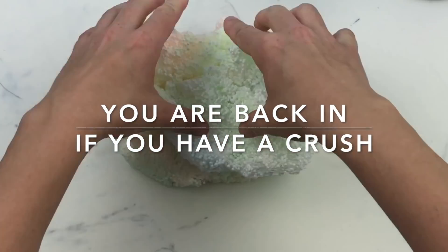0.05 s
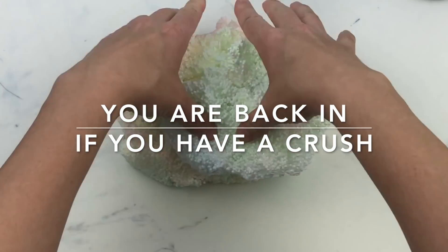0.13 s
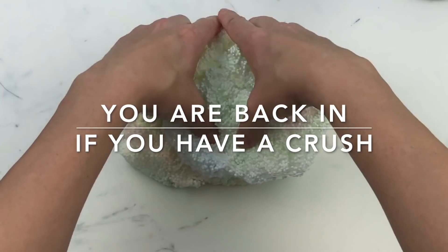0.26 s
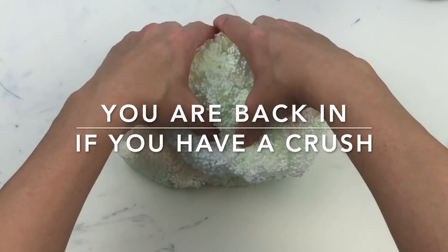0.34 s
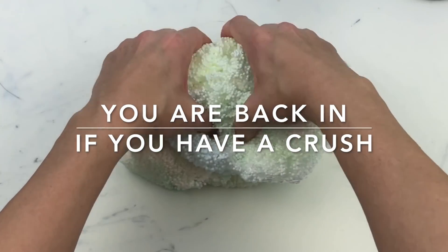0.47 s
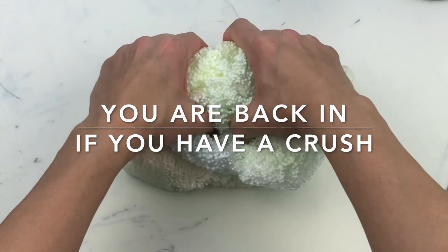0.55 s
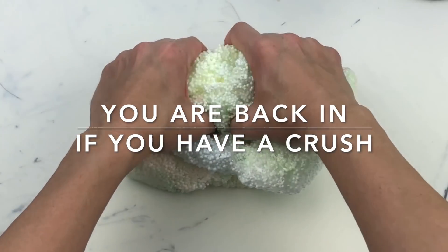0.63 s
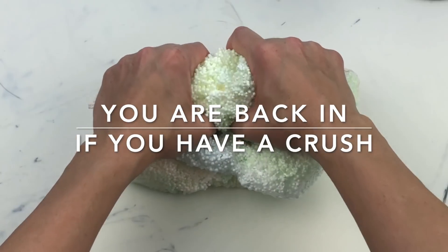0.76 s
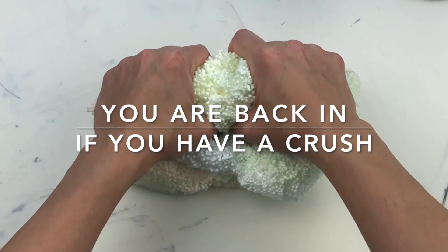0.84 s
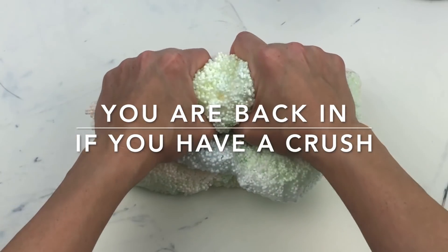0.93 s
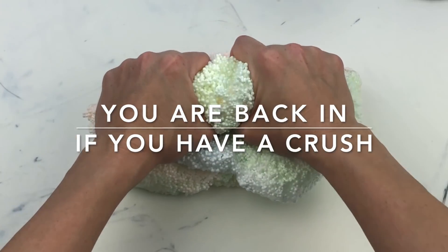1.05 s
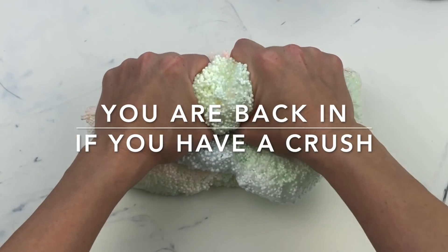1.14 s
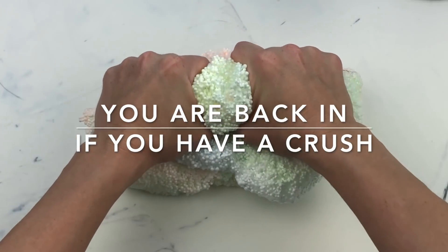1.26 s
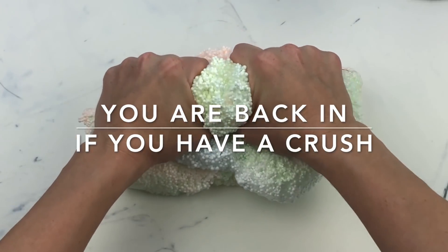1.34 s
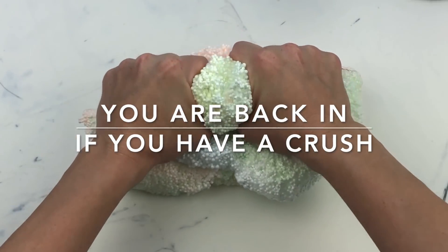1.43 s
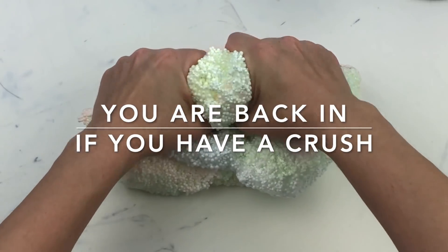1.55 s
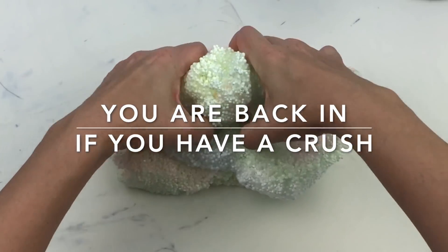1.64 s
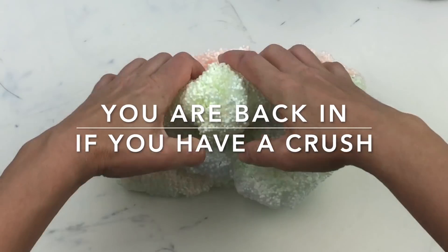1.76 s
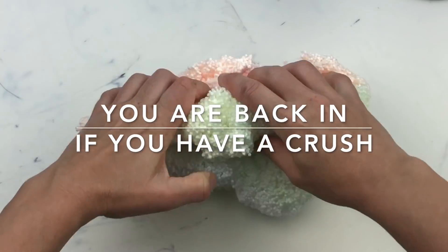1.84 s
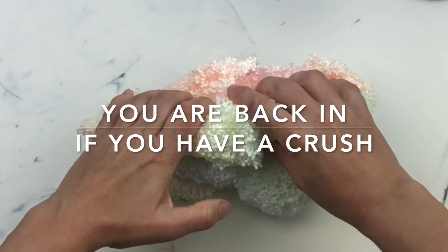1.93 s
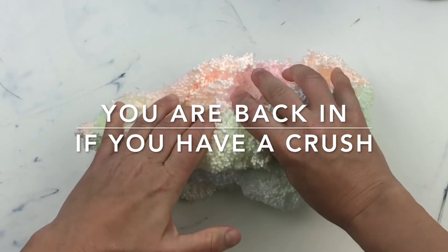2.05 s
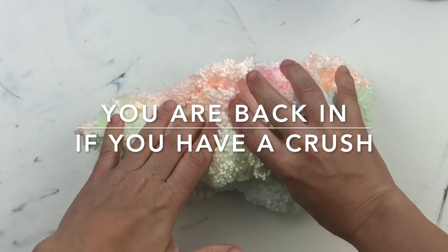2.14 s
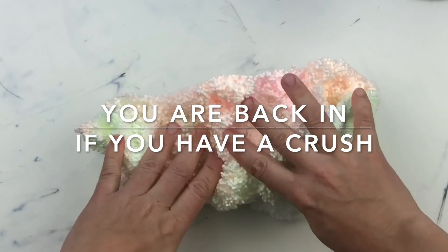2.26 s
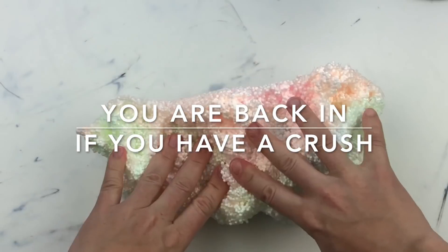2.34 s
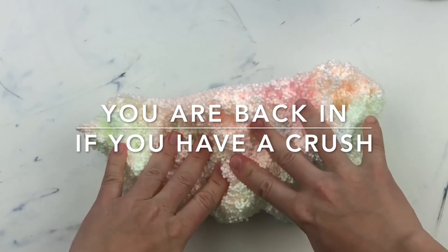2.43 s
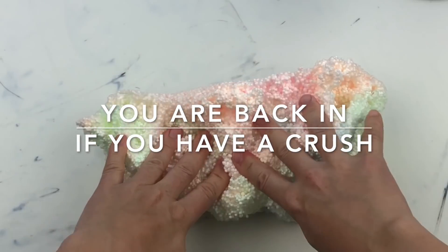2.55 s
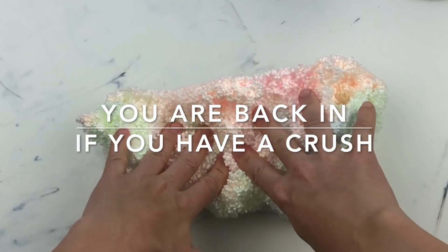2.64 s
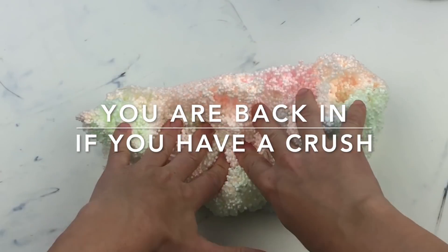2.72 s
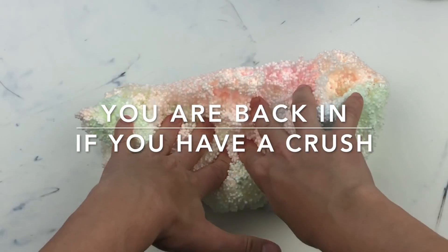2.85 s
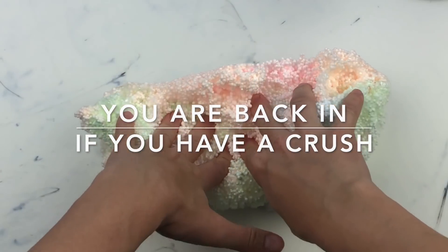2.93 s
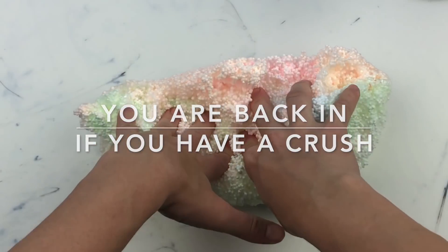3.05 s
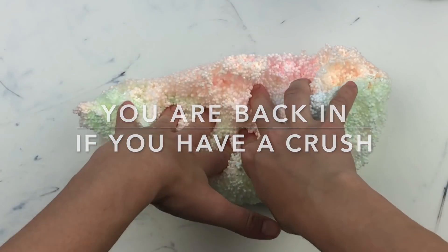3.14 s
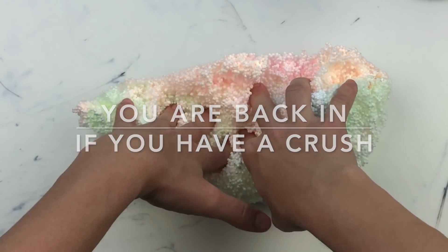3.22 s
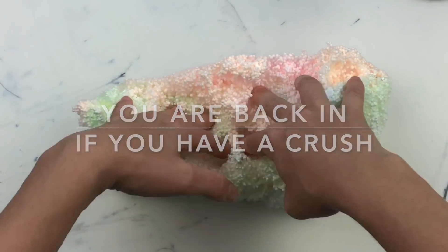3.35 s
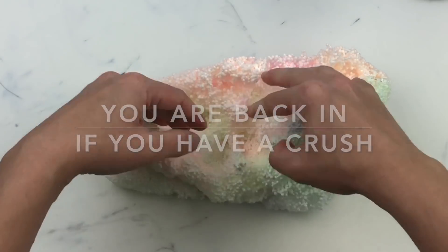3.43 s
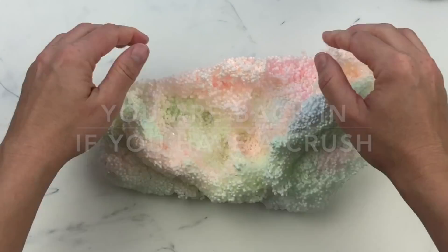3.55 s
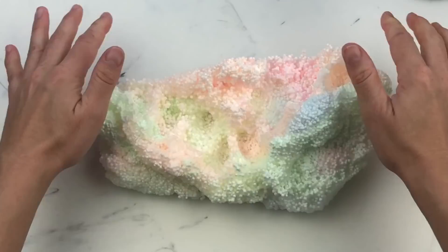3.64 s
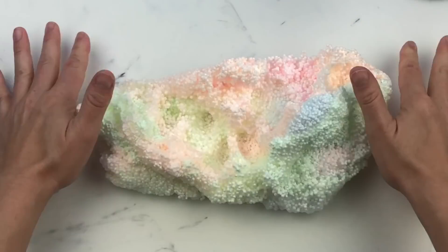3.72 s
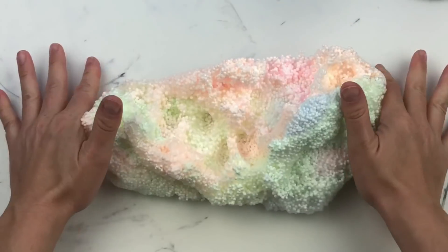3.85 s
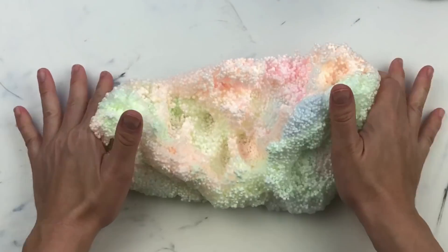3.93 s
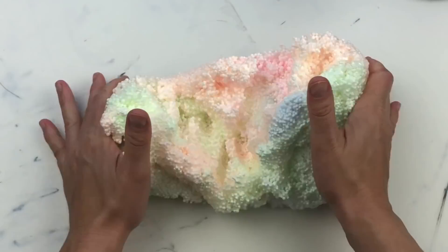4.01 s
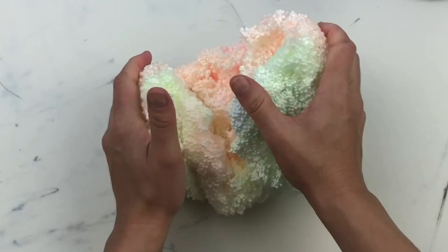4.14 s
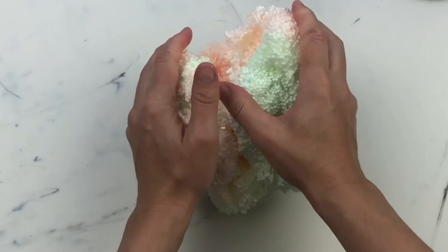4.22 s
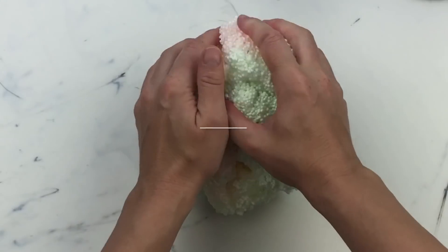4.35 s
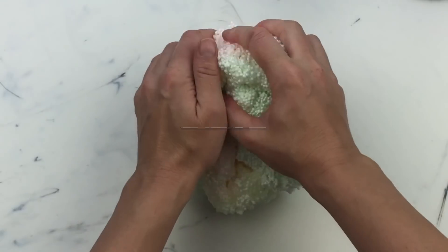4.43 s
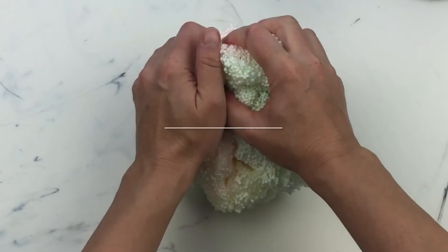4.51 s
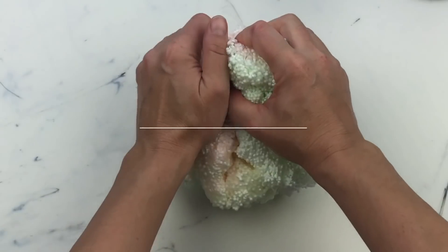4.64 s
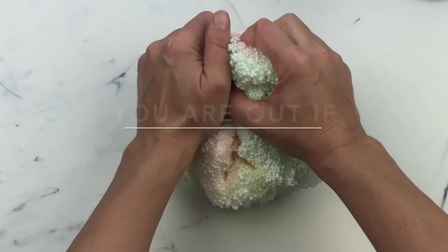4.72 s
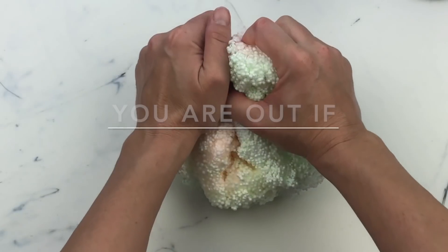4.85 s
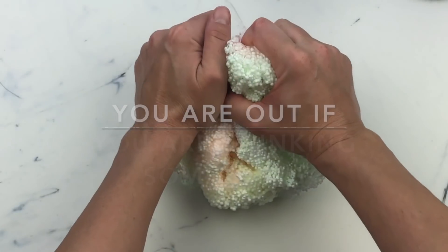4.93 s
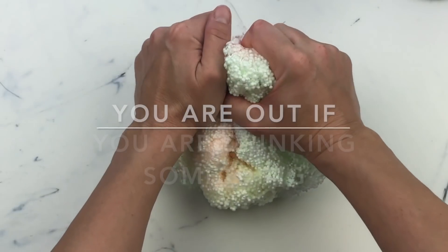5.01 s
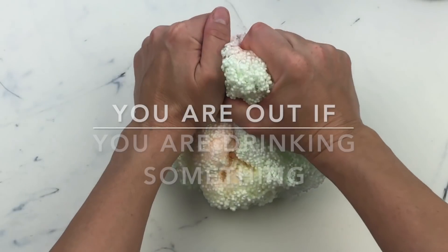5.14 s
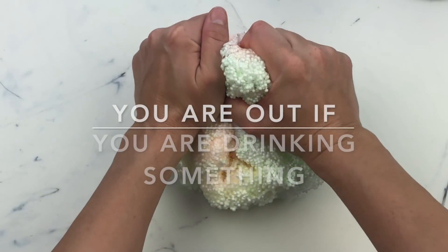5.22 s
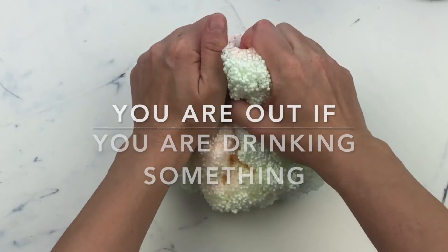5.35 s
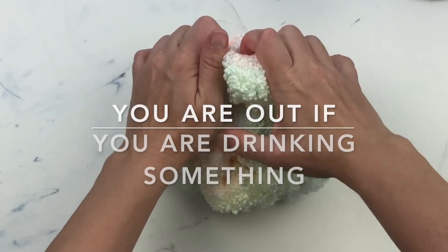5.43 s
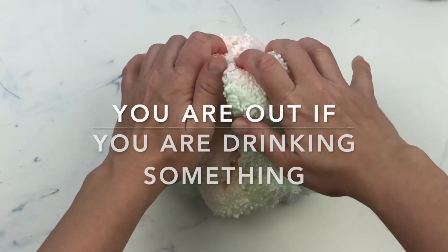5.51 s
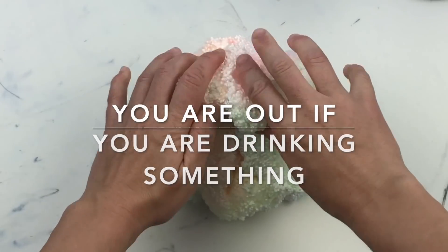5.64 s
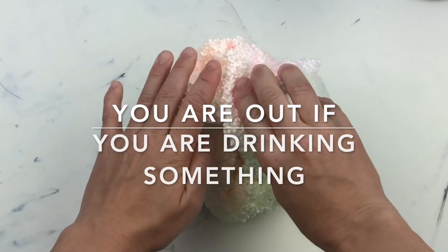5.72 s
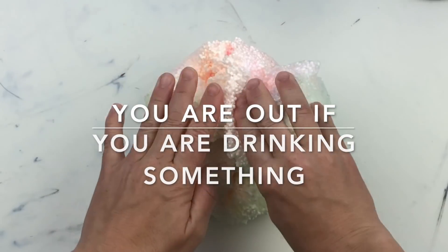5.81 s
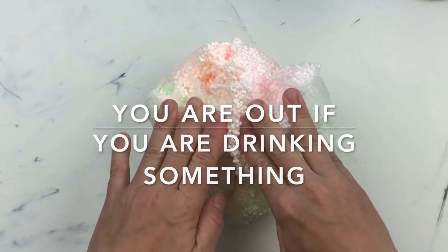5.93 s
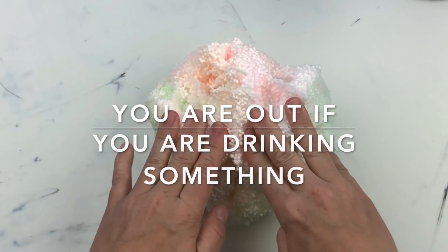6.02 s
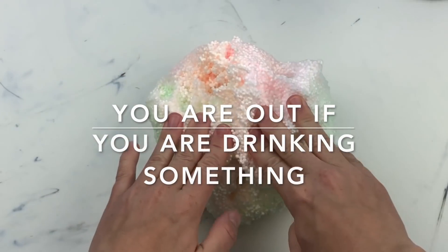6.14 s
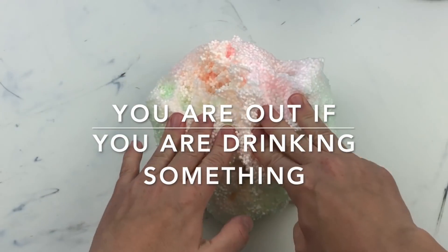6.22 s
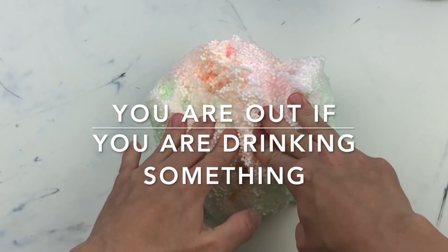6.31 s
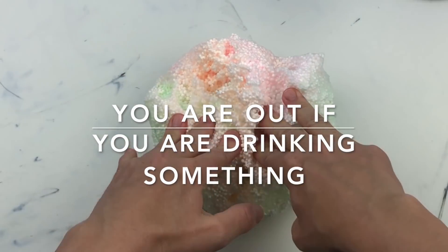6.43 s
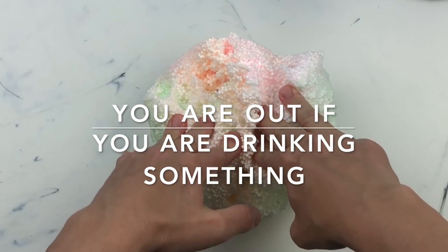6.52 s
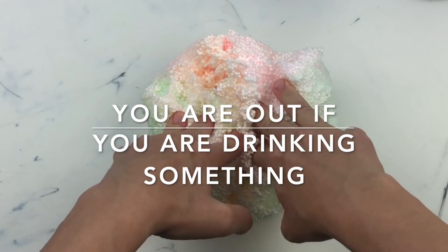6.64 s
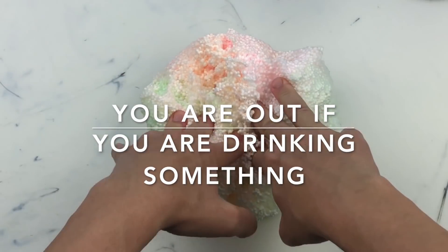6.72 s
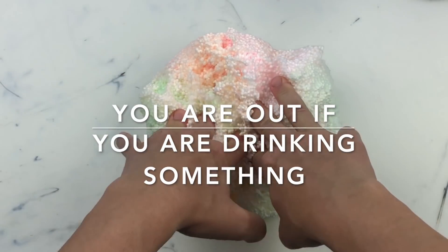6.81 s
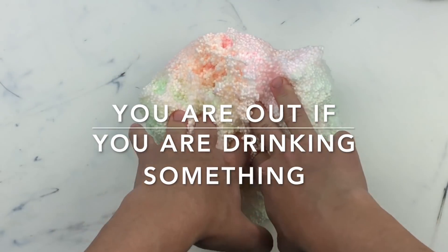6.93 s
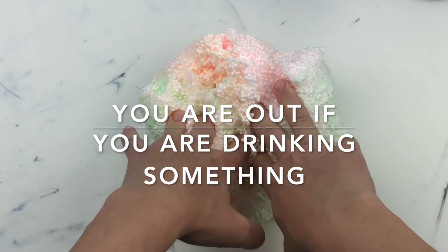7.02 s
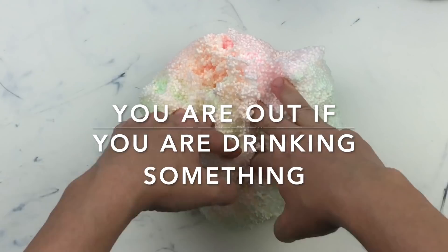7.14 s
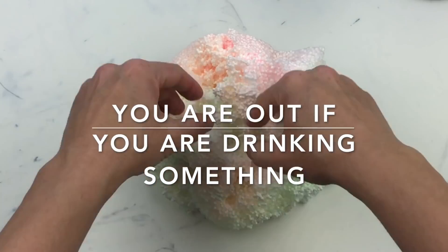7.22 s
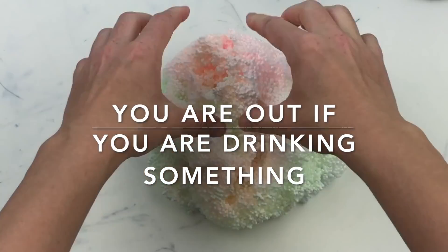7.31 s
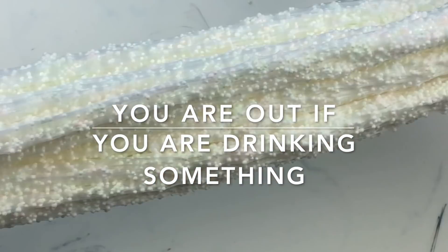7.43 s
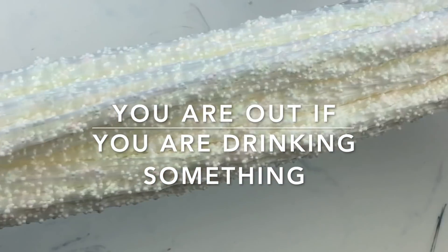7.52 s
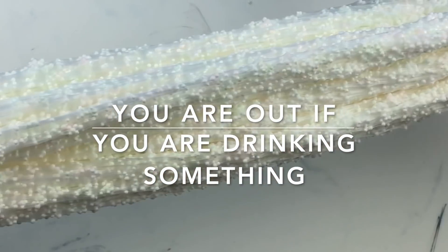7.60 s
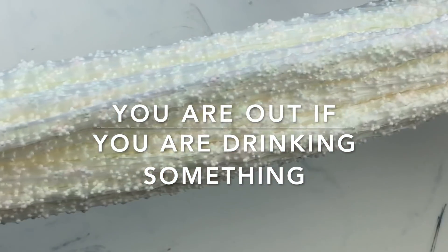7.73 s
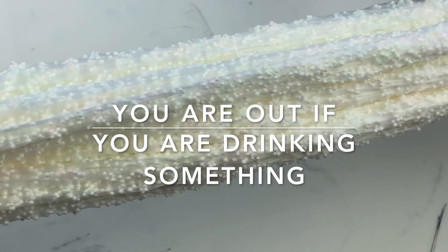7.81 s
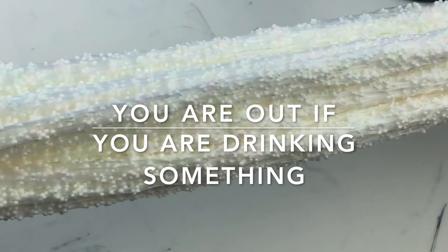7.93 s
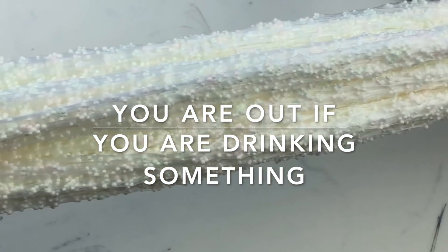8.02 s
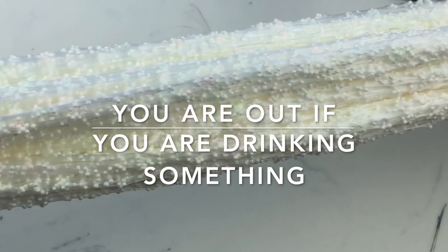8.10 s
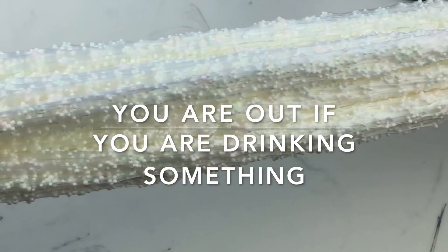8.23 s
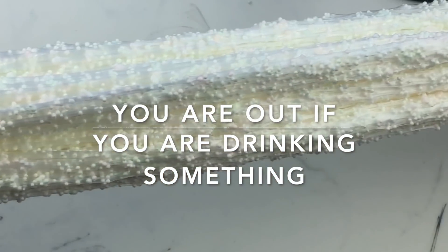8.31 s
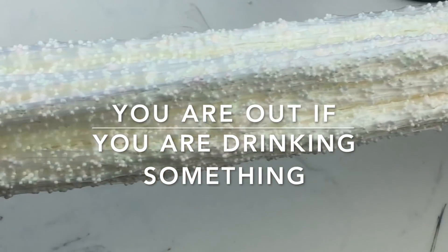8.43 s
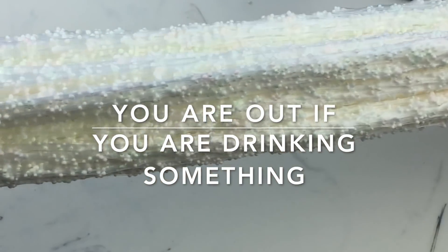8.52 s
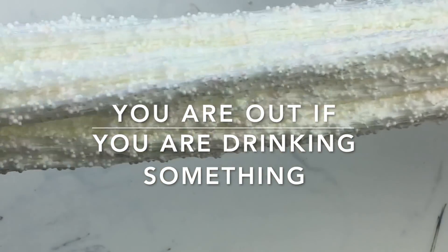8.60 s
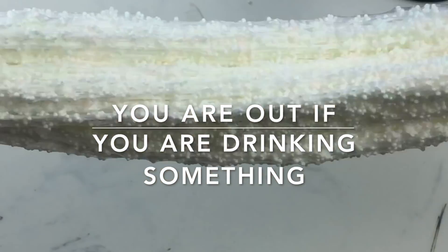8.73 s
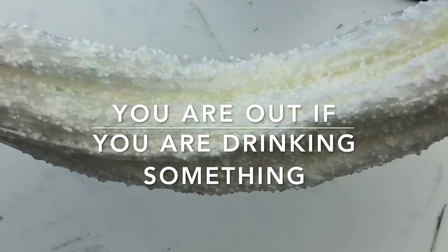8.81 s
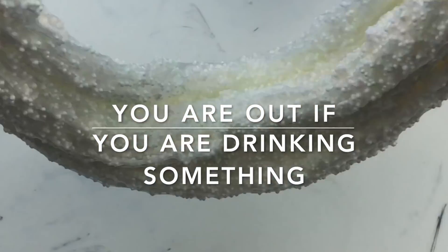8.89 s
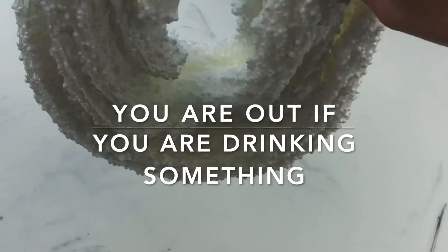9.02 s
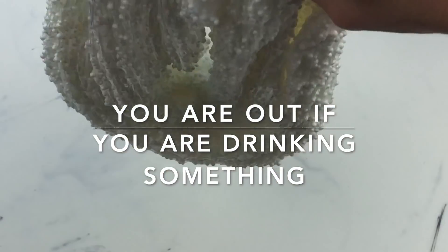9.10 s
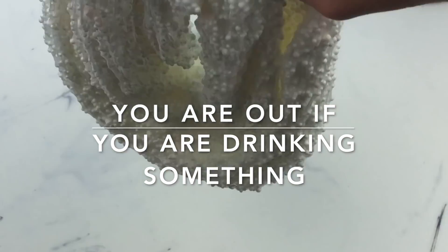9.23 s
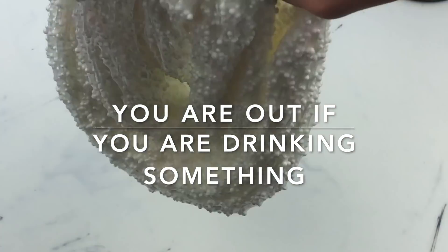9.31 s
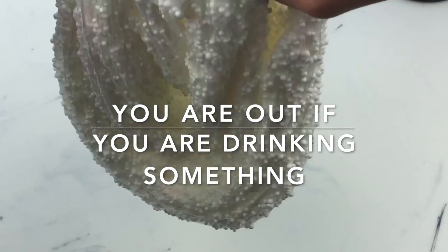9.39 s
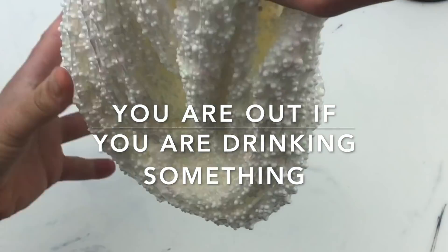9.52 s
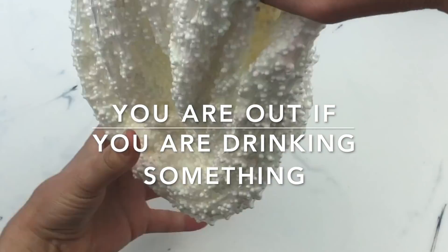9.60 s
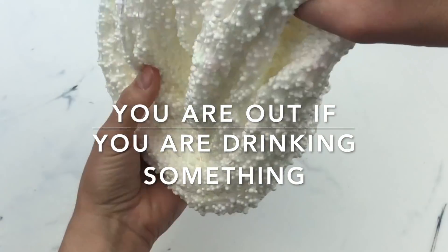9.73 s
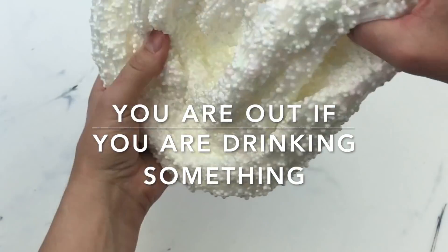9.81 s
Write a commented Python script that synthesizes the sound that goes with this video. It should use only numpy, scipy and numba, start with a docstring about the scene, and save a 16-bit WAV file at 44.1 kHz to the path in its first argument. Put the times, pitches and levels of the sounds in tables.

```python
"""Two hands knead a lump of foam-bead slime on a table, close by in a small quiet room.
Beads part from the sticky glue as a crackle of ringing ticks, and folds let air sputter out in squelches.
The table thuds and rumbles as shaken resonances; a gliding sine makes a high squeak near 2.4 s, another a faint tone.
Trapped air pockets burst as torn, ringing pops, most densely and loudly from about 4.4 to 5.2 s.
At about 7.5 s later strokes set in abruptly: the hands pull the slime into a long band and fold it."""
import sys
import numpy as np
from scipy import signal
from scipy.fft import rfft, irfft
from scipy.io import wavfile
from scipy.ndimage import uniform_filter1d
from numba import njit

SR = 44100
rng = np.random.default_rng(int(sys.argv[2]) if len(sys.argv) > 2 else 0)


def file_out(sig):
    """Save sig as 16-bit WAV at sys.argv[1]."""
    # one column per channel
    cols = np.atleast_2d(sig).T
    # limit, then scale
    lim = np.clip(cols, -1, 1)
    pcm = np.round(lim * 32767).astype(np.int16)
    wavfile.write(sys.argv[1], SR, pcm)


N = 434826
TIME = np.arange(N) / SR

# palms and lump landing on the table: (peak_time_s, level_db before a small trim, pitch_hz)
THUDS = [(0.032, -13, 95), (0.298, -9, 65), (0.61, -15.5, 55.7), (1.679, -3, 45), (1.923, -14, 58),
         (2.399, -17, 68), (3.047, -16, 70), (3.388, -16.5, 51.87), (3.44, -20, 65), (3.506, -16, 54.5),
         (3.832, -19.5, 63), (4.034, -18.5, 65), (4.27, -15.5, 49), (5.493, -1, 68), (5.561, -10.5, 50.17),
         (5.722, -16.5, 63.2), (5.776, -19.5, 64.6), (7.225, -19, 56.24), (7.293, -13, 58.64)]
# resonances of the table top: (pitch_hz, width_hz, relative_level_db)
TOP_MODES = [(177.7, 10, -0.5), (232, 35, -20), (293.7, 7.3, -11)]


def from_db(db):
    """Turn decibels into a gain."""
    return 10 ** (np.asarray(db) / 20)


def rms_one(x):
    """Scale a sound to an average power of 1."""
    return x / np.sqrt(np.mean(x ** 2) + 1e-20)


def in_time(rows):
    """Draw straight lines between the points of a table, for every sample."""
    time_s, *columns = np.transpose(rows)
    return [np.interp(TIME, time_s, column) for column in columns]


def at_hz(points, hz):
    """Read a level between the points of a table, with pitch on a log scale."""
    point_hz, point_db = np.transpose(points)
    return np.interp(np.log(hz), np.log(point_hz), point_db)


def add(out, start_s, sound):
    """Mix in a sound at a given time."""
    at = int(np.clip(round(start_s * SR), 0, N - 1))
    out[at:at + len(sound)] += sound[:N - at]


def band(x, low_hz, high_hz, order=2):
    """Keep only the pitches between two limits (Butterworth band-pass)."""
    limits = [low_hz, min(high_hz, .48 * SR)]
    return signal.sosfilt(signal.butter(order, limits, "band", fs=SR, output="sos"), x)


def resonate(x, hz, quality):
    """Ring at one pitch with gain 1 there; a higher quality rings longer."""
    w = 2 * np.pi * min(hz, .45 * SR) / SR
    damp = np.sin(w) / (2 * quality)
    # the tiny offset keeps the filter from slowing down on near-zero numbers
    return signal.lfilter([damp, 0, -damp], [1 + damp, -2 * np.cos(w), 1 - damp], x + 1e-18)


def drift(per_s):
    """Wander at random between new values drawn per_s times a second, with power 1."""
    knots = np.arange(0, TIME[-1] + 1, 1 / per_s)
    return rms_one(np.interp(TIME, knots, rng.standard_normal(len(knots))))


def even(x, span_s):
    """Level out a sound so that its power stays near 1 over a running span."""
    power = np.abs(uniform_filter1d(x ** 2, int(span_s * SR)))
    return x / np.sqrt(power + 1e-12)


def together(*columns_db):
    """Add the powers of unrelated sounds and return the joint level in dB."""
    power = np.sum(from_db(np.hstack(columns_db)) ** 2, axis=1)
    return 10 * np.log10(power + 1e-12)


def air():
    """The steady hush of the room: random noise shaped by a fixed spectrum."""
    # colour of the hush: (pitch_hz, relative_level_db)
    hush_colour = [(60, -4), (180, -1), (500, -6), (1500, -17), (5000, -72), (16000, -15)]
    hush_db = -60
    hz = np.maximum(np.arange(N // 2 + 1) * SR / N, 1)
    spectrum = rfft(rng.standard_normal(N)) * from_db(at_hz(hush_colour, hz))
    return from_db(hush_db) * rms_one(band(irfft(spectrum, N), 30, 15000))


def room(x, near_db=-11, near_t60=0.021, far_db=-19, far_t60=0.21, edge_count=7):
    """Distinct echoes, a quick scatter and a faint tail; scatter and tail are noise led by the sound's power."""
    # reflections off the table and nearby things: (delay_s, level_db)
    echo_rows = [(.0019, -15), (0.01, -19)]
    t = TIME[:SR // 4]
    lingering = np.zeros(len(t))
    for t60, db in [(near_t60, near_db), (far_t60, far_db)]:  # t60 (s) sets how fast each part fades
        power = from_db(-120 * t / t60) * (t > .001)
        lingering += from_db(2 * db) * power / power.sum()
    out, edges = x.copy(), np.geomspace(300, 16000, edge_count)
    for low_hz, high_hz in zip(edges, edges[1:]):
        power = signal.oaconvolve(band(x, low_hz, high_hz, order=3) ** 2, lingering)[:N]
        noise = rms_one(band(rng.standard_normal(N), low_hz, high_hz, order=3))
        out += np.sqrt(np.abs(power)) * noise
    for delay_s, db in echo_rows:
        add(out, delay_s, from_db(db) * band(x, 4300, 15000, order=1))
    return out


def shaken(modes, low_hz, high_hz, span_s):
    """Table resonances ring under random pushes, levelled out to power 1."""
    rings = np.zeros(N)
    for hz, width_hz, db in modes:
        rings += from_db(db) * resonate(rng.standard_normal(N), hz, hz / width_hz)
    return even(band(rings, low_hz, high_hz, order=4), span_s)


def rumble(push_db, sway_db=-1.5, waver_db=1.5, frame_lean_db=-10, frame_push_db=0.0,
           top_db=-5.0, top_push_db=-12.0, thud_frame_db=-18, thud_top_db=-23, ring_db_per_s=220):
    """Leaning arms sway the table's legs unevenly; strokes and thuds also shake its frame and drum its top."""
    # resonances of the legs, then of the frame: (pitch_hz, width_hz, relative_level_db)
    sway_modes = [(36.2, 6.8, 0)]
    frame_modes = [(62.1, 6.7, 0), (78.3, 28, -12), (118, 30, -20)]
    # weight of the arms on the table, before wavering and trims: (time_s, level_db)
    lean_rows = [(0, -37), (.2, -22.5), (.6, -36), (.8, -37.5), (1.4, -37), (1.59, -27), (1.69, -15),
                 (1.82, -31), (2.85, -30.5), (3.25, -40), (3.43, -28), (3.75, -35), (4.4, -31),
                 (4.65, -36.5), (5.35, -39.5), (5.51, -15.5), (5.68, -31.5), (6.05, -28), (6.5, -34),
                 (7.35, -30), (7.5, -49.5), (9.86, -43)]
    # faint drumming of the table top, before wavering and trims: (time_s, level_db)
    drum_rows = [(0, -42), (.9, -42), (1.35, -45.5), (1.9, -46.5), (2.6, -47), (3.25, -48.5), (3.44, -28.5),
                 (3.56, -50), (3.7, -53), (3.9, -41), (4.4, -49), (4.58, -34.5), (4.75, -42.5), (5.2, -53),
                 (5.65, -57), (6.0, -55), (7.1, -52), (7.45, -59.5), (9.86, -59)]
    (lean_db,), (drum_db,) = in_time(lean_rows), in_time(drum_rows)
    waver = waver_db * drift(9)
    ringing = np.zeros(N)
    for time_s, db, _ in THUDS:
        add(ringing, time_s, from_db(db - ring_db_per_s * TIME[:SR // 3]))
    # unrelated shakes add up as powers
    frame = np.linalg.norm([from_db(lean_db + waver + frame_lean_db),
                            from_db(push_db + frame_push_db),
                            from_db(thud_frame_db) * ringing], axis=0)
    top = np.linalg.norm([from_db(drum_db + waver + top_db),
                          from_db(push_db + top_push_db),
                          from_db(thud_top_db) * ringing], axis=0)
    sway = from_db(lean_db + waver + sway_db)
    return (frame * shaken(frame_modes, 45.8, 118, 0.079)
            + top * shaken(TOP_MODES, 81, 358, 0.084)
            + sway * shaken(sway_modes, 29.2, 53.3, 0.137))


def thuds(rise_s=0.01145, level_db=-0.5, knock_db=-21):
    """A soft blow makes the table swing low, swelling and dying quickly; the top adds a dull knock."""
    out, t = np.zeros(N), TIME[:SR // 5]
    swell = (t / rise_s * np.exp(1 - t / rise_s)) ** 2.0
    knock = from_db(knock_db) * np.sin(2 * np.pi * TOP_MODES[0][0] * t)
    for peak_s, db, hz in THUDS:
        swing = np.cos(2 * np.pi * hz * (t - rise_s))
        add(out, peak_s - rise_s, from_db(db + level_db) * swell * (swing + knock))
    return out


def squeak():
    """A brief high squeak and a very faint tone near 1.5 kHz: gliding sines that swell and sink."""
    # the two tones: (start_s, length_s, peak_level_db, start_pitch_hz, end_pitch_hz)
    tone_rows = [(2.41, 0.028, -26.5, 5700, 5446), (3.609, 0.049, -55, 1504, 1480)]
    out = np.zeros(N)
    for start_s, length_s, db, start_hz, end_hz in tone_rows:
        u = np.linspace(0, 1, int(length_s * SR))
        phase = 2 * np.pi * np.cumsum(start_hz + (end_hz - start_hz) * u) / SR
        add(out, start_s, from_db(db) * np.sin(np.pi * u ** 1.5) * np.sin(phase))
    return out


def squelches(per_s=1200, rise_s=0.024, spread_db=4):
    """A fold closes and its air sputters out in random clicks through a hollow that rings."""
    # folds closing on trapped air: (start_s, length_s, level_db before fading, pitch_hz, quality)
    fold_rows = [(1.608, 0.058, -38, 460, 1.41), (1.91, 0.013, -22, 2596, 2.05),
                 (2.248, 0.034, -32.5, 879, 1.98), (2.252, 0.079, -36.5, 2703, 3.9),
                 (3.39, 0.064, -26, 652, 9.5), (3.943, 0.013, -21.5, 1284, 4.3),
                 (7.205, 0.039, -35.5, 2302, 2.38), (7.255, .04, -35, 3230, 1.58),
                 (8.173, 0.015, -27, 1182, 2), (8.655, 0.053, -30, 525.6, 2.4),
                 (9.013, 0.042, -51.5, 1905, 5.3), (9.167, 0.072, -51, 1806, 4.5),
                 (9.317, 0.068, -39, 648.5, 2.85), (9.318, 0.14, -43, 1757, 9.8)]
    out = np.zeros(N)
    for start_s, length_s, db, hz, quality in fold_rows:
        t = TIME[:int(length_s * SR)]
        sputter = (rng.random(len(t)) < per_s / SR) * from_db(spread_db * rng.standard_normal(len(t)))
        ring = resonate(sputter * rng.choice([-1, 1], len(t)), hz, quality)
        hollow = rms_one(band(ring, hz / 2, hz * 2, order=1))
        fade = np.minimum(t / rise_s, 1) * np.sqrt(1 - t / length_s)
        add(out, start_s, from_db(db) * hollow * fade)
    return out


def kneading(tighten_db_per_s=270, relax_db_per_s=230, late_strokes_s=7.467):
    """The grip tightens before each stroke and relaxes after it; returns the levels of crackle and push."""
    # squeezes and presses, later stretches and folds; levels before trims in the sounds they drive:
    # (start_s, end_s, crackle_db, swell_over_stroke_db, squelch_above_crackle_db,
    #  fizz_above_crackle_db, table_push_db)
    stroke_rows = [(0, 0.013, -41, 0, 0, -5, -19), (0.283, 0.418, -49, -3, -4, -8, -50),
                   (0.481, 0.551, -38, 1.5, -1, -1, -30), (0.593, 0.646, -37.5, 0, 0.5, -5.5, -24.5),
                   (0.692, 0.999, -38.5, 0.5, -4, -3.5, -44), (1.06, 1.4, -41, -1.5, -5.5, -5.5, -45.5),
                   (1.57, 1.588, -38, 2, 2.5, -3.5, -36), (1.615, 1.679, -27.5, 2, 5.5, -5, -20),
                   (1.73, 1.818, -29, 4, -5.5, -4.5, -29), (1.911, 1.928, -43, 0, -1.5, -12.5, -30),
                   (2.031, 2.221, -48.5, -1, -1.5, -4, -42), (2.261, 2.286, -37, 0, 3.5, -9, -29.5),
                   (2.332, 2.397, -41, 2, -5.5, -1.5, -27.5), (2.72, 2.86, -52, 6, 2.5, -1, -37),
                   (3.069, 3.171, -52, 0, -7, -4, -45), (3.28, 3.314, -52, 0, -4.5, -21, -54),
                   (3.404, 3.434, -30, 0, -2, -7.5, -21), (3.472, 3.489, -42, -4, 1, -16, -30),
                   (3.97, 4.015, -37, 2, -1.5, -3, -27.5), (4.09, 4.27, -47, 4.5, -3, -1.5, -36),
                   (4.41, 4.469, -44, 2, -3.5, -3, -45), (4.56, 4.67, -39, 0, -1, 1, -38.5),
                   (4.73, 4.868, -38, 3, -7, -3, -44.5), (4.93, 5.202, -35, -6, -7, -4, -40.5),
                   (5.389, 5.44, -31, 2, 3, -2.5, -29.5), (5.48, 5.549, -29.5, 1, 1, -3, -24),
                   (5.598, 5.62, -39, -3, -7, -4, -30), (5.68, 5.78, -51, -2, -5, 2.5, -44),
                   (5.917, 5.962, -48, -4, -6, 4.5, -41), (6.345, 6.393, -48, -6.5, -19, -2.5, -48),
                   (6.618, 6.942, -49, 2, -3, -5, -62), (7.185, 7.28, -38.5, 0.5, -1.5, -6.5, -29),
                   (7.477, 7.761, -39, 1, -6, -5, -52), (7.801, 8.5, -43, -6, -8.5, -6, -56.5),
                   (8.17, 8.208, -39, 0, -2.5, -25, -51), (8.601, 8.8, -45, -6, -6, 0.5, -51),
                   (8.669, 8.69, -35.5, -1, -6.5, 1, -41), (9.009, 9.048, -42.5, 1.5, -8.5, -2, -49),
                   (9.175, 9.229, -40.5, -4, -26, -8, -49), (9.299, 9.37, -35, 1, -5, -2.5, -51),
                   (9.422, 9.599, -44, -1.5, -21, -4.5, -64), (9.69, 9.715, -41, 0.5, -9, -3, -52),
                   (9.788, 9.861, -38, 7.5, -15, -1.5, -42)]
    # the slime goes on settling between strokes: (time_s, crackle_db)
    settling_rows = [(0, -70), (.1, -62), (.16, -55), (1.46, -55), (2.55, -54), (3.52, -55), (3.66, -64),
                     (3.8, -68), (3.85, -56), (5.2, -55), (5.3, -61), (5.65, -56), (6.55, -54),
                     (7.3, -57.5), (7.46, -64), (7.52, -49), (8.55, -49), (9.1, -54), (9.86, -49)]
    settling_squelch_db, settling_fizz_db = -2.5, -6  # relative to the settling crackle
    t = TIME[::64, None]  # slow curves need only every 64th sample
    start, end, db, swell, squelch, fizz, push = np.transpose(stroke_rows)
    grip = -tighten_db_per_s * np.maximum(start - t, 0) - relax_db_per_s * np.maximum(t - end, 0)
    # strokes that start after this time are held down to near silence before it
    grip = np.where((start > late_strokes_s) & (t < late_strokes_s), -100, grip)
    progress = np.clip((t - start) / np.maximum(end - start, .001), 0, 1)
    effort = db + grip + swell * (progress - .5)
    settling = np.interp(t, *np.transpose(settling_rows))
    beads = together(effort, settling)
    large = together(effort + squelch, settling + settling_squelch_db)
    tiny = together(effort + fizz, settling + settling_fizz_db)
    curves = (beads, large - beads, tiny - beads, together(push + grip))
    return [np.interp(TIME, t[:, 0], curve) for curve in curves]


@njit
def ring_grains(at, strength, step, fade, size):
    """Sum short damped sines: step in radians and fade in nepers (natural-log units) per sample."""
    out = np.zeros(size)
    for k in range(len(at)):
        keep = np.exp(-fade[k])
        turn = 2 * keep * np.cos(step[k])
        now, before = strength[k] * np.sin(step[k]), 0.
        for i in range(at[k], min(size, at[k] + int(6 / fade[k]))):
            out[i] += now
            now, before = turn * now - keep * keep * before, now
    return out


def cavities(at, size, low_hz, high_hz, quality, colour_db):
    """Each release of a bead rings a cavity with a pitch and damping of its own."""
    # strength of the cavities between the beads by pitch: (pitch_hz, relative_level_db)
    bead_colour = [(280, -4.5), (450, -4.5), (660, 3.5), (900, -2), (1400, -1), (2000, 9), (2700, 8.5),
                   (3900, 4), (6000, 12), (8000, 1.5), (10500, -5.5), (15000, 12.5)]
    place, damping, share, side = rng.random((len(at), 4)).T
    hz = low_hz * (high_hz / low_hz) ** place
    step = 2 * np.pi * hz / SR
    fade = step / (2 * quality * 2 ** (2 * damping - 1))
    gain = from_db(at_hz(bead_colour, hz) + colour_db * (2 * share - 1))
    # sqrt(fade) evens out the energy of short and long rings
    strength = size * gain * np.sign(side - .5) * np.sqrt(fade)
    return band(ring_grains(at, strength, step, fade, N), low_hz * 0.89, high_hz * 1.07)


def crackle(crackle_db, squelch_db, fizz_db, per_s=2200, crowding=.7, spread_db=5.0, size_cap=3.73,
            clump_db=3.5, colour_db=4.0, quality=4.3, rustle_per_s=9000, rustle_db=-2.5,
            squelch_trim_db=-2.6, crackle_trim_db=-2.42, fizz_trim_db=0.88):
    """Beads let go of the glue at random, crowding under harder kneading, over a rustle from deep inside."""
    chance = per_s * from_db(crowding * (crackle_db + 40) + 3 * drift(30)) / SR
    ticks = np.flatnonzero(rng.random(N) < chance)
    luck = np.minimum(rng.exponential(1, len(ticks)), size_cap)
    size = from_db(spread_db * luck + clump_db * drift(90)[ticks])
    deep = np.flatnonzero(rng.random(N) < rustle_per_s / SR)
    out = np.zeros(N)
    # lowest and highest pitch (Hz), level relative to crackle_db (dB)
    families = [(270.0, 1532, squelch_db + squelch_trim_db),
                (1280, 5370, crackle_trim_db),
                (5530, 13800, fizz_db + fizz_trim_db)]
    for low_hz, high_hz, family_db in families:
        surface = even(cavities(ticks, size, low_hz, high_hz, quality, colour_db), 0.22)
        inside = rms_one(cavities(deep, 1, low_hz, high_hz, quality, colour_db))
        out += from_db(crackle_db + family_db) * even(surface + from_db(rustle_db) * inside, 0.13)
    return out


def bubbles(crackle_db, per_s=55, crowding=.55, level_db=12.5, spread_db=2.0,
            low_hz=750, high_hz=7500, quality=3.3, largest_db=-35):
    """Now and then a small bubble near the surface bursts and rings clearly at one pitch."""
    chance = per_s * from_db(crowding * (crackle_db + 40)) / SR
    at = np.flatnonzero(rng.random(N) < chance)
    place, size, damping = rng.random((len(at), 3)).T
    step = 2 * np.pi * low_hz * (high_hz / low_hz) ** place / SR
    fade = step / (2 * quality * (.5 + damping))
    # largest_db caps the crackle level before level_db and the spread are added
    strength = from_db(np.minimum(crackle_db[at], largest_db) + level_db + spread_db * (2 * size - 1))
    return band(ring_grains(at, strength, step, fade, N), 380, 12000)


def random_pops(crackle_db, per_s=9, crowding=.8, above_db=14, spread_db=4.0, largest_db=-20,
                low_hz=1300, high_hz=9000, quality=1.9):
    """Draw further pops at random, more often and louder under a harder grip; rows as for the placed ones."""
    chance = per_s * from_db(crowding * (crackle_db + 40)) / SR
    at = np.flatnonzero(rng.random(N) < chance)
    size, place, damping = rng.random((len(at), 3)).T
    db = np.minimum(crackle_db[at] + above_db + spread_db * (2 * size - 1), largest_db)
    hz = low_hz * (high_hz / low_hz) ** place
    return list(zip(at / SR, db, hz, quality * 2 ** (2 * damping - 1)))


def pops(pockets, body_db=-19, body_hz=800, body_quality=1.6, tear_s=0.00038, ragged=.22, snap_db=-22,
         smear_quality=1.52, chain_per_s=1500, chain_db=-11, chain_s=0.0047, level_db=-0.5):
    """A film tears in under a millisecond, a few neighbours give way after it, and the pocket rings briefly."""
    # centres of the all-pass filters that spread each pop in time: (pitch_hz)
    smear_pitches_hz = [2830, 5070, 8500, 11900]
    out, t = np.zeros(N), TIME[:SR // 60]
    draws = rng.standard_normal((len(pockets), 2, len(t)))
    for (start_s, db, hz, quality), (chance, luck) in zip(pockets, draws):
        gives_way = np.abs(luck) < chain_per_s / SR * np.sqrt(np.pi / 2)
        chain = from_db(chain_db) * gives_way * np.exp(-t / chain_s)
        tear = chance * (ragged * np.exp(-t / tear_s) + chain)
        tear[0] += 1
        pop = rms_one(resonate(tear, hz, max(quality, .5))) + from_db(snap_db) * rms_one(tear)
        pop = band(pop, np.clip(hz / 3.8, 300, 1100), 16300)  # a small source radiates little bass
        # the lump around it knocks
        pop = rms_one(pop) + from_db(body_db) * rms_one(resonate(tear, body_hz, body_quality))
        for smear_hz in smear_pitches_hz:  # all-pass: spreads the pop over a few cycles, less spiky
            pop = pop - 2 * resonate(pop, smear_hz, smear_quality)
        # the level counts the whole pop's energy as if packed into one millisecond
        packed = np.sqrt(.001 * SR / len(t))
        add(out, start_s, from_db(db + level_db) * rms_one(pop) * packed)
    return out


def scene():
    """The slime sounds in the room, with the two tones, the table and the hush."""
    # air pockets bursting at set times, loud and soft:
    # (start_s, level_db before a small trim, pitch_hz, quality before a floor)
    placed_pops = [(0.128, -35, 4480, 0.4), (0.1931, -31.5, 2970, 0.46), (0.2839, -32.5, 1860, 0.43),
                   (0.3937, -28, 1970, 0.33), (0.5316, -17, 746, 0.67), (0.7104, -19, 1640, 10),
                   (0.7604, -24.5, 2070, 3.1), (0.8372, -18, 4250, 0.4), (0.8632, -17.5, 1320, 3.1),
                   (0.888, -18, 2240, 0.45), (1.002, -23.5, 5300, 3.8), (1.066, -23.5, 630, 2.7),
                   (1.251, -23, 1600, 5.4), (1.3081, -19.5, 3330, 1.2), (1.4789, -23.5, 660, 1.5),
                   (1.813, -17, 5910, 3.03), (1.9226, -28.5, 591.7, 3.2), (2.2487, -22, 1509, 2.3),
                   (2.4288, -24, 6210, 2.81), (2.5653, -27.5, 1380, 1.6), (2.6492, -29.5, 2980, 0.58),
                   (2.883, -34, 13500, 1.48), (3.1303, -30.5, 3273, 0.37), (3.4764, -21.5, 5500, 1.31),
                   (3.8253, -35.5, 7038, 4.95), (4.3846, -16.5, 6440, 0.32), (4.4403, -23, 1740, 1.75),
                   (4.4738, -26, 1640, 0.42), (4.5042, -15.5, 2650, 0.29), (4.532, -20, 799.5, 1.88),
                   (4.5825, -3.5, 7100, 1.16), (4.6132, -12.5, 7000, 0.43), (4.628, -17.5, 6940, 0.75),
                   (4.6539, -14.5, 5540, 4.7), (4.666, -21, 13000, 0.72), (4.7256, -22, 1200, 1.96),
                   (4.7464, -18.5, 4854, 4.73), (4.8576, -22, 3570, 1.72), (4.9008, -20, 2695, 1.18),
                   (4.9277, -16, 2794, 3.1), (4.9388, -15, 3740, 0.88), (4.9696, -17.5, 2830, 1.93),
                   (5, -30, 2873, 0.71), (5.0087, -9.5, 3213, 1.2), (5.0244, -2, 6350, 2.47),
                   (5.098, -12, 12120, 1.6), (5.1113, -14, 906, 3.2), (5.128, -10, 1984, 0.3),
                   (5.174, -7.5, 10240, 0.34), (5.223, -22, 2879, 1.2), (5.475, -11.5, 12520, 0.42),
                   (5.8477, -24, 3203, 0.5), (5.8884, -10.5, 9500, 0.56), (6.0582, -28.5, 2852, 1.02),
                   (6.1559, -24.5, 8940, 0.61), (6.1994, -26.5, 2360, 0.86), (6.3215, -13.5, 3844, 1.12),
                   (6.4225, -31, 2746, 0.46), (6.7755, -27, 1774, 2.37), (6.8947, -10, 5034, 0.72),
                   (6.8952, -17.5, 953.6, 0.66), (7.5183, -26.5, 3270, 0.77), (7.5448, -19.5, 3700, 0.65),
                   (7.7332, -24.5, 3263, 1.22), (7.9296, -20.5, 3718, 1.32), (8.184, -21.5, 930, 3.18),
                   (8.4504, -28, 4467, 0.43), (9.1468, -24, 1980, 0.53), (9.1719, -17.5, 2013, 1.3),
                   (9.2221, -26, 2725, 0.43), (9.2717, -21.5, 3922, 0.47), (9.323, -18.5, 1654, 1.94),
                   (9.3493, -17, 1103, 2.7), (9.3802, -23, 1980, 1), (9.396, -18.5, 1640, 6.9),
                   (9.4746, -22, 2149, 1.24), (9.7705, -20, 2880, 0.72)]
    flutter_db, flutter_per_s = 1.0, 45  # random flutter of the crackle level
    crackle_db, squelch_db, fizz_db, push_db = kneading()
    crackle_db = crackle_db + flutter_db * drift(flutter_per_s)
    slime = pops(placed_pops + random_pops(crackle_db))
    slime = slime + bubbles(crackle_db) + crackle(crackle_db, squelch_db, fizz_db) + squelches()
    return (room(slime) + squeak() + thuds() + rumble(push_db) + air())[None]


def record(dry):
    """Flatten peaks beyond 0.92, then cut the treble steeply above the cutoff."""
    cutoff_hz = 16200
    treble_cut = signal.ellip(10, .1, 80, cutoff_hz, fs=SR, output="sos")
    return signal.sosfilt(treble_cut, np.clip(dry, -.92, .92))


dry = scene()
out = record(dry)
file_out(out)
```